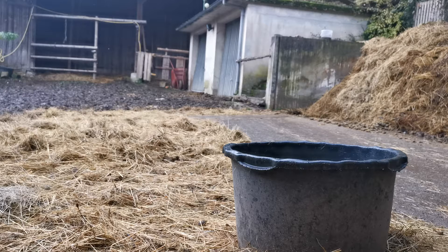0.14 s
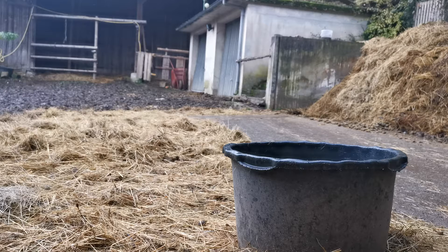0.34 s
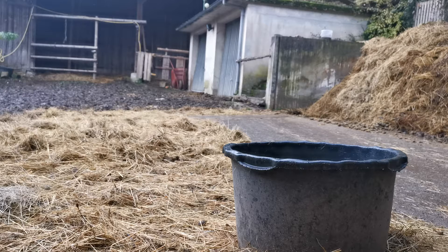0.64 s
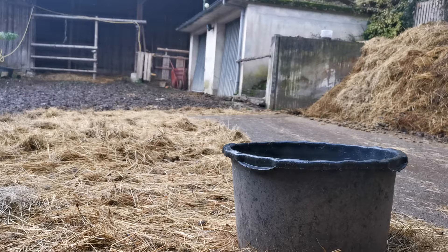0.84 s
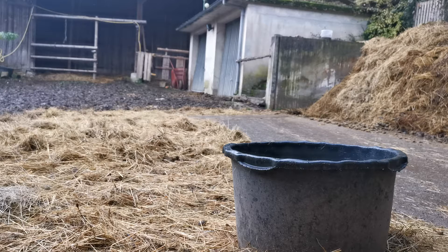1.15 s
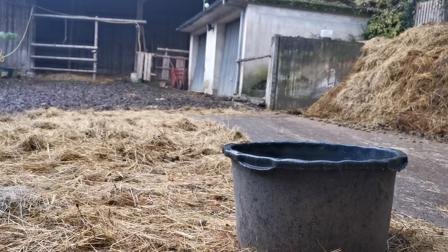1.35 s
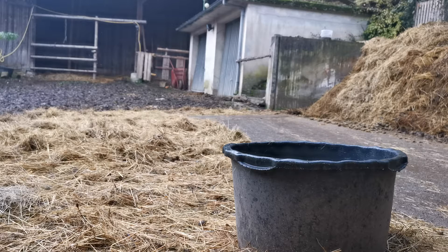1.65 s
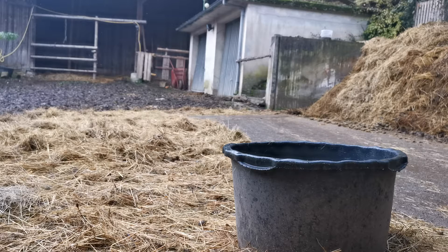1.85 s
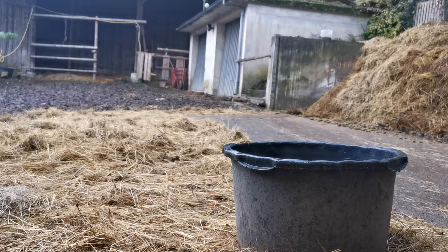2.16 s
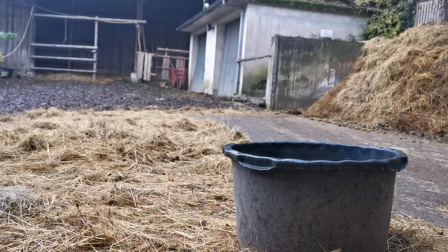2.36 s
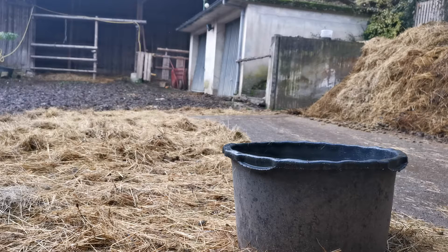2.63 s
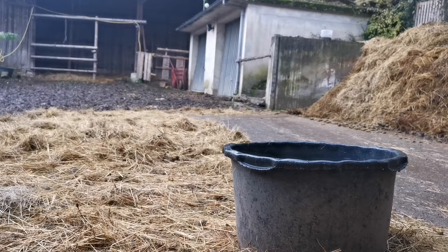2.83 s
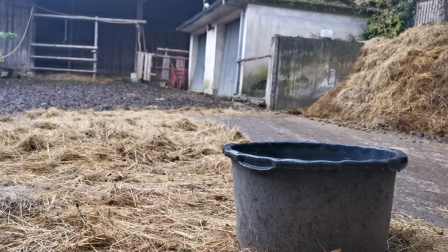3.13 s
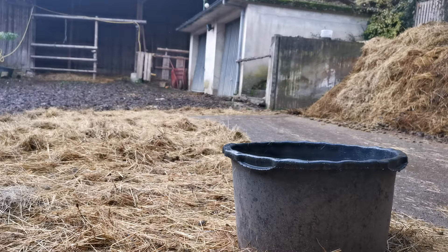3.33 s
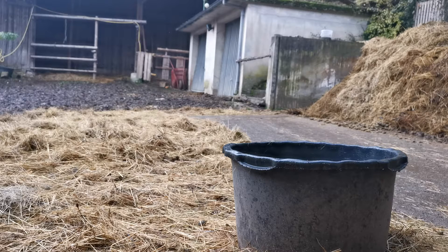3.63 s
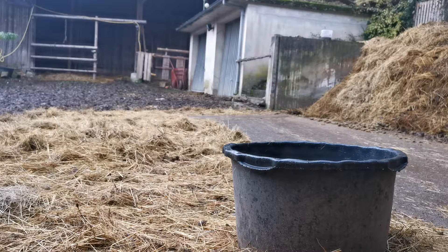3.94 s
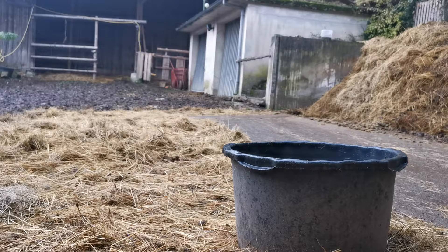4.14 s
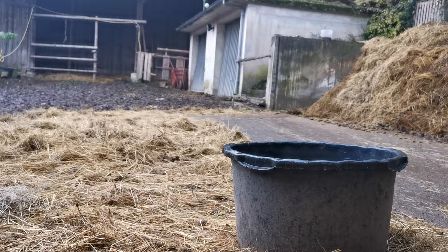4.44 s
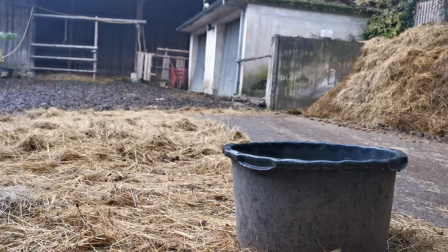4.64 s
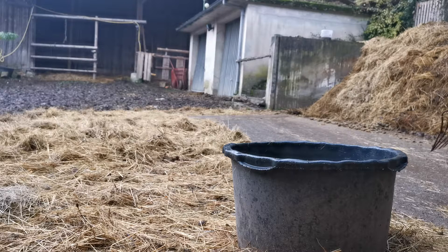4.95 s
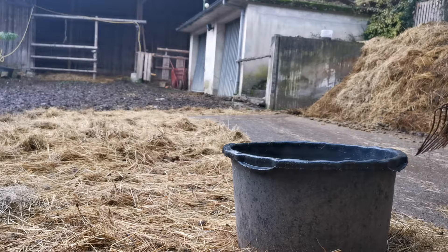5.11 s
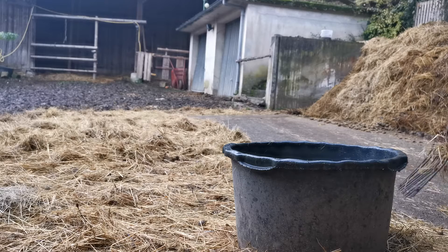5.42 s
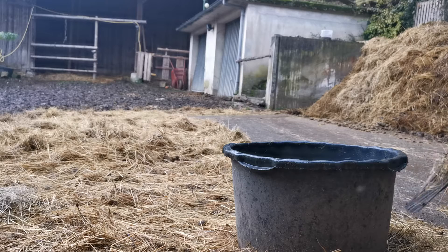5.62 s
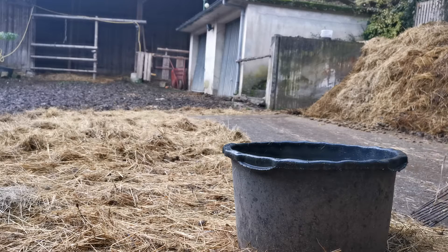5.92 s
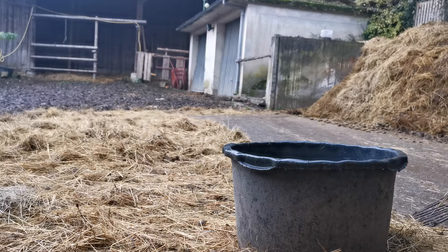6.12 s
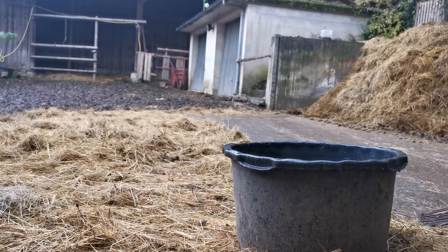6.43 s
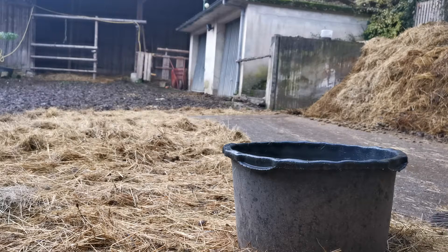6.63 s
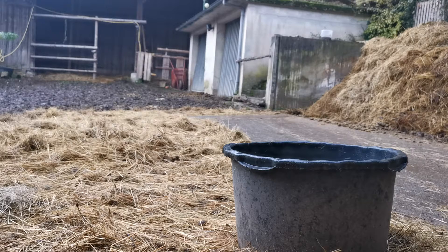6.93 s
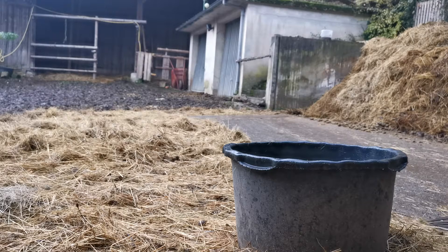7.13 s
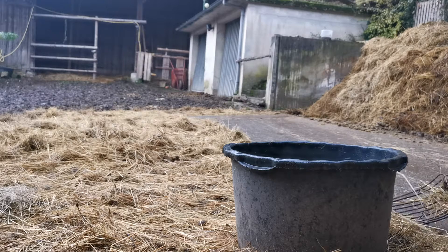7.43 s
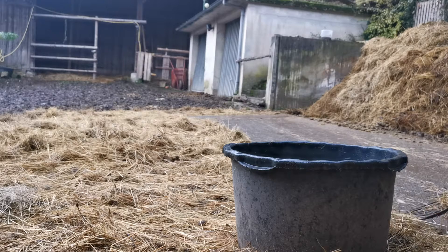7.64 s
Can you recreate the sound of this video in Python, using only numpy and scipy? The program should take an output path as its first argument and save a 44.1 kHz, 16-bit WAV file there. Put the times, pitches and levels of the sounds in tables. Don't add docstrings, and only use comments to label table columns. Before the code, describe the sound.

Close stereo pickup outdoors: small metallic taps lead to two hard, hollow tub blows. Faint grit shuffles, then a rapid run of bright blade scrapes and another burst of booming, clanking knocks. It falls much quieter, with dull treads and dry straw rustle over faint distant air, before steel tines scrape sharply across the ground and finish with crisp ticks.

```python
import sys
import numpy as np
from scipy import signal
from scipy.fft import rfft, irfft, next_fast_len
from scipy.io import wavfile

SR = 44100
rng = np.random.default_rng(int(sys.argv[2]) if len(sys.argv) > 2 else 0)


def linear_from_db(decibels):
    return 10 ** (np.asarray(decibels, float) / 20)


def wav_out(sig):
    wavfile.write(sys.argv[1], SR, np.round(np.clip(np.atleast_2d(sig).T, -1, 1) * 32767).astype(np.int16))


N = 342657
SIZE, HIT_SIZE = next_fast_len(N + 20000, True), 2 ** 13
STEP = 32

# (frequency [Hz], level [dB])
AIR_COLOUR = [(12, -33), (25, 5.5), (55, 2.5), (161, -9.5), (393, -13.5), (534, -10.5), (767, -12),
              (1380, -13.5), (3000, -16.5), (4800, -23), (7310, -21), (9930, -42.5), (15500, -41)]
AIR_DB = -62
# (frequency [Hz], width [Hz], level [dB], end [s])
HINGE = (1830, 150, -65, 0.2)
# (frequency [Hz], width [Hz], level [dB])
HINGE_UPPER = (2200, 220, -6)
# (frequency [Hz], width [Hz], level [dB])
TUB_MODES = [(99, 16, -10.5), (142, 27, 3.5), (247, 16, -4.5), (317, 16.7, -4), (412.2, 7, -5.5),
             (492, 6, -17.5), (554, 15, -24), (710, 30, -7.5)]
# (frequency [Hz], width [Hz], level [dB])
BLADE_MODES = [(1080, 32, -1.5), (1420, 61, -2), (1730, 20, -6.5), (2180, 44, 4), (2550, 25, -13.5),
               (3010, 77, -16.5), (4200, 350, -9.5), (7120, 1000, 5.5)]
# (frequency [Hz], level [dB])
DRAG_COLOUR = [(20, -35), (40, -13.5), (97, 1.5), (270, -1.5), (410, 6.5), (550, 1.5), (1140, -3.5),
               (1640, -2.5), (2600, -3.5), (5500, -16), (7200, -22), (9800, -37.5), (15500, -50)]
DRAG_EDGES_HZ = (20, 250, 900, 3500, 16000)
# (time [s], wall level [dB], boom level [dB], own pitch [Hz], contact [s])
BLOWS = [(0.311, -34.5, -71, 382, 0.027), (0.332, -34, -48.5, 385, 0.091), (0.902, -9.5, -19, 554, 0.016),
         (1.059, -11.5, -18, 416, 0.13), (1.302, -55, -40, 322, 0.046), (2.827, -30.5, -37, 730, 0.044),
         (3.045, -53, -36, 386, 0.026), (3.107, -42, -28.5, 270, 0.044), (3.5565, -21.5, -23, 171, 0.098),
         (3.674, -26, -31.5, 241, 0.036), (3.733, -31.5, -40, 342, 0.087), (3.796, -20.5, -38, 382, 0.1),
         (3.895, -38, -38, 431, 0.036), (3.951, -23.5, -23.5, 270, 0.089), (4.565, -52, -81, 249, 0.2),
         (3.575, -27.5, -40, 304, 0.025)]
# (time [s], clack
# level [dB], crack level [dB], own pitch [Hz], contact [s])
TAPS = [(0.259, -32, -30, 2840, 0.05), (0.313, -30.5, -37.5, 1060, 0.0058),
        (0.418, -42.5, -43.5, 1100, 0.054), (0.461, -18, -39, 2014, 0.032), (0.526, -49, -40, 2830, 0.045),
        (0.544, -36.5, -37, 1740, 0.084), (0.687, -33.5, -71, 2310, 0.088),
        (0.756, -56, -37.5, 3940, 0.015), (0.897, -20, -26.5, 1044, 0.088), (0.94, -37, -23, 910, 0.023),
        (1.015, -44, -33.5, 1040, 0.054), (1.058, -18, -22.5, 1020, 0.056),
        (2.242, -19.5, -15.5, 1990, 0.0064),
    (2.276, -26.5, -53, 2420, 0.023),
    (2.288, -37, -21.5, 2500, 0.042),
    (2.344, -25.5, -47, 2460, 0.053),
    (2.379, -21.5, -21, 2550, 0.041),
    (2.437, -41, -72, 2160, 0.046),
    (2.49, -20, -23.5, 2260, 0.18),
    (2.534, -35.5, -38, 1560, 0.12),
    (2.615, -27, -25, 1730, 0.012),
    (2.696, -37.5, -40.5, 1730, 0.024),
        (2.827, -17, -25, 826, 0.045), (2.9276, -28.5, -37, 2400, 0.031), (2.945, -24, -24, 2870, 0.058),
           (3.011, -70, -35, 4030, 0.042), (3.048, -24.5, -31, 2070, 0.024),
           (3.097, -33.5, -51.5, 1900, 0.041), (3.129, -27.5, -44, 1730, 0.041),
           (3.324, -40, -34, 2500, 0.006), (3.554, -19.5, -26, 764, 0.043),
           (3.7914, -14.5, -71, 1080, 0.095), (3.8046, -14.5, -16, 1213, 0.076),
           (3.8948, -18.5, -28.5, 1090, 0.11), (4.073, -38, -43.5, 1420, 0.03)]
# (start [s], hold [s], wall level [dB], rumble over wall [dB])
SHOVES = [(0.5, 0.0047, -60, -3.5), (0.71, 0.008, -65, 5), (0.78, 0.24, -74, 10), (1.17, 0.075, -64, 17.5),
          (1.63, 0.021, -77.5, 22), (1.72, 0.093, -62, 6.5), (1.85, 0.0025, -48, -6),
          (1.96, 0.026, -70.5, 21), (2.045, 0.042, -52, 1), (2.25, 0.054, -52, 3.5),
          (2.41, 0.054, -61.5, 14.5), (2.51, 0.087, -57.5, 8), (2.68, 0.031, -63.5, -14.5),
          (2.98, 0.0039, -62.5, -3), (3.075, 0.053, -58.5, 1), (3.2, 0.058, -67, 4),
          (3.42, 0.074, -58.5, -2), (3.63, 0.081, -55, 1.5), (3.83, 0.0015, -29.5, -3),
          (3.89, 0.056, -43, -2.5), (4.04, 0.042, -63, 11.5)]
# (start [s], hold [s], grit level [dB], fine grit over grit [dB])
PUSHES = [(0.5, 0.016, -65, -3), (0.71, 0.00085, -65, 7), (0.75, 0.06, -64.5, 7),
          (0.925, 0.004, -44.5, 0.5), (0.99, 0.067, -68, 2), (1.1, 0.0034, -62.5, 3.5),
          (1.27, 0.021, -71.5, 0.5), (1.7, 0.14, -71.5, 1.5), (1.8, 0.049, -64.5, -5),
          (1.96, 0.015, -64, -3.5), (2.03, 0.042, -69.5, 0.5), (2.25, 0.099, -56.5, 0.5),
          (2.41, 0.011, -66, -3), (2.5, 0.15, -65, -1), (2.72, 0.03, -66.5, -16), (2.8, 0.22, -71.5, 5.5),
          (3.065, 0.013, -58.5, -6), (3.13, 0.0065, -56.5, 0.5), (3.35, 0.17, -80.5, 12.5),
          (3.48, 0.0015, -45, -7), (3.59, 0.002, -61, 3.5), (3.66, 0.053, -56, -19.5),
          (3.83, 0.0036, -49.5, -2), (3.92, 0.049, -53.5, -15.5)]
# (start [s], hold [s], grit level [dB], fine grit over grit [dB])
JERKS = [(2.3, 0.0054, -48, -18), (2.405, 0.0052, -49.5, 4), (2.437, 0.0061, -46.5, 4),
         (2.487, 0.0022, -43.5, -9.5), (2.51, 0.016, -43, -7), (2.545, 0.0088, -43.5, 0),
         (2.563, 0.0033, -54.5, 9), (2.59, 0.0034, -47, 2.5), (3.055, 0.022, -45.5, -8.5),
         (3.108, 0.0031, -52, -1), (3.95, 0.011, -54, 0)]
RATTLE_AFTER_S, RATTLE_HOLD_S = 0.038, 0.0036
RATTLE_RUMBLE_DB, RATTLE_WALL_DB = -18, -27.5
DRAG_BED_DB = (-80, -85.5, -77, -83)
BLOW_CLICK_DB, CLICK_PER_DB = 20, 0.44
GRAIN_CONTRAST = (.6, .7, 1.01, 1.2)
# (time [s], level [dB])
SET_DOWN = (1.0595, -15.5)
# (frequency [Hz], level [dB], t60 [s])
HOLLOW = [(137, -12, 0.11), (203, -3.5, 0.14), (322.4, 1.5, 0.07), (382, -4, 0.072), (431, 8, 0.11),
          (513, -1.5, 0.23), (587, -3, 0.13)]
# (time
# [s], ring level [dB], crack level [dB], pitch [Hz], t60 [s])
TICKS_AND_RINGS = [(0.2601, -34, -27, 3100, 0.0085), (0.308, -29, -41, 810, 0.011), (0.3321, -45, -56, 734, 0.057),
                   (0.4616, -31.5, -26.5, 1080, 0.038), (0.5195, -53, -30.5, 2700, 0.0088),
                   (0.557, -41, -41, 4200, 0.0077), (0.611, -49, -58, 1070, 0.032), (0.69, -36.5, -67, 2630, 0.074),
                   (0.695, -30, -63.5, 2840, 0.017), (0.703, -39.5, -66, 1750, 0.086),
                   (0.7297, -41, -66, 1230, 0.014), (0.804, -38, -39, 2020, 0.011), (0.9038, -21.5, -27, 1057, 0.074),
                   (1.609, -50, -56, 3730, 0.018), (1.756, -50, -58, 2060, 0.055), (1.841, -34, -50, 1080, 0.014),
                   (1.848, -37, -51, 1084, 0.06), (1.981, -48, -50, 2460, .02), (2.04, -48.5, -60, 1577, 0.17),
                   (2.06, -49, -60, 2090, 0.091), (2.2038, -42, -55, 2250, 0.016), (2.332, -39, -45, 2500, .008),
                   (2.345, -33, -30.5, 4000, 0.006), (2.434, -41, -34, 4200, 0.0083), (2.446, -34, -34, 2300, 0.0092),
                   (2.457, -30, -42, 2160, 0.012), (2.468, -40, -44, 2400, .008), (2.489, -25, -21, 1580, 0.011),
                   (2.506, -47, -25, 2300, .012), (2.524, -29, -43, 1010, .012), (2.541, -26.5, -24, 4440, 0.014),
                   (2.563, -29, -29, 2240, 0.0083),
                   (2.5863, -35, -40, 2500, 0.011), (2.604, -43, -25, 3500, .006), (2.647, -39, -55, 1060, 0.017),
         (2.735, -46, -48, 2500, .01), (3.109, -35, -46, 1200, 0.018), (3.631, -44, -44, 2230, 0.12),
         (3.653, -30.5, -50, 830, 0.027), (3.667, -42, -41, 2900, 0.01), (3.676, -29, -52, 1020, 0.041),
         (3.706, -26, -52, 705, 0.012), (3.719, -26, -50, 636, 0.015), (3.742, -26, -53, 900, .02),
         (3.745, -44, -56, 2400, 0.047), (3.749, -32, -54, 1134, 0.06), (3.792, -27, -16.5, 3620, 0.038),
         (3.806, -20.5, -44, 2770, 0.033), (3.82, -32, -60, 2140, 0.11), (3.85, -39, -58, 1920, 0.21),
         (3.904, -35, -21.5, 1130, 0.048), (4.045, -45, -56, 1280, 0.034), (7.09, -46, -70, 3290, 0.091),
         (7.1173, -40, -40, 3270, 0.032), (7.392, -38, -60, 5000, .03), (7.396, -32, -60, 660, 0.033),
         (7.462, -26.5, -65, 3934, 0.069), (7.7, -52, -69, 1065, 0.052),
                   (1.165, -40, -84, 48, 0.29), (2.6, -36.5, -90, 75, 0.23), (3.06, -29, -44, 1150, 0.022),
         (2.9, -44, -51, 7500, 0.006), (3.378, -45, -57, 6800, 0.02), (3.4056, -35, -44, 7350, 0.0088),
         (3.41, -39.5, -90, 95, 0.25), (3.5531, -11, -58, 228, 0.052), (3.5539, -9.5, -55, 673, 0.016),
         (3.624, -30, -60, 253, 0.046), (3.691, -26, -75, 210, .031), (3.712, -23, -66, 242, .041),
         (3.8935, -37, -39, 690, 0.012), (4.57, -51, -90, 570, 0.19), (4.581, -49.5, -90, 251.5, 0.26),
         (4.8275, -42, -30, 11000, 0.0046), (5.2945, -57, -60, 8000, .011), (4.7, -45, -63, 150, .081),
         (5.3165, -53, -48, 11500, 0.0071), (7.6, -32.5, -53, 4050, .024), (7.638, -49, -54.5, 6000, 0.014)]
SWELL_PER_S = 0.35
# (start [s], hold [s], level [dB])
DUST = [
    (1.74, 0.1, -61),
    (2.04, 0.048, -63.5),
    (6.169, .04, -74),
]
# (centre [Hz], width [Hz])
DUST_BAND = (6970, 350)
# (frequency [Hz], width [Hz], level [dB])
TINE_MODES = [(624, 62, 4.5), (1230, 170, -1), (2400, 98, 3), (3220, 13, -6), (3650, 46, 1.5),
              (3800, 57, -11.5), (4900, 87, -4), (7110, 400, 0.5)]
# (frequency [Hz], level [dB])
RAKE_COLOUR = [(20, -11), (40, -4), (200, -17.5), (673, -7), (808, -5), (1100, 2.5), (1900, 5), (2400, 4.5),
               (3680, 6), (5700, 4), (7200, 3), (9800, -13), (15500, -27.5)]
RAKE_EDGES_HZ = (20, 300, 1500, 4500, 16000)
# (start [s], hold [s], thump level [dB], stalks over thump [dB])
TREADS = [
    (4.62, 0.016, -61, -41),
    (4.8, 0.092, -69, -15),
    (5.0, 0.037, -87.5, 14.5),
    (5.27, 0.14, -69.5, -13),
    (5.9, 0.0099, -79.5, 6),
    (6.1, 0.055, -76, 0),
    (7.4, 0.0045, -52.5, -5.5),
    (7.45, 0.027, -61.5, 3.5),
    (7.6, 0.015, -66, -22),
]
# (start [s], hold [s], rustle level [dB], fine rustle over rustle [dB])
RUSTLES = [(4.79, 0.069, -71.5, 8), (5.0, 0.17, -73.5, -0.5), (5.33, 0.049, -71.5, 4.5),
           (5.45, 0.065, -70, -9), (5.75, 0.23, -75, 0), (5.9, 0.0032, -72, -2.5), (6.08, 0.032, -72, -2.5),
           (6.38, 0.055, -74, -0.5), (6.62, 0.029, -68.5, -6.5), (7.468, 0.0044, -53, 2.5),
           (7.565, 0.0014, -56.5, 3), (7.63, 0.066, -68, 6)]
# (time [s], clack level [dB], crack level [dB], own pitch [Hz], contact [s])
SNAPS = [(4.7711, -66, -71, 2570, 0.026), (4.788, -49, -54, 3010, 0.034), (4.826, -40.5, -35, 7320, 0.044),
         (5.3145, -64, -38.5, 8440, 0.029), (5.803, -59.5, -48.5, 1270, 0.02),
         (5.871, -39.5, -42.5, 3240, 0.083), (5.911, -44, -51, 3130, 0.04), (6.021, -47, -51, 2110, 0.064),
         (6.069, -43, -44, 1347, 0.079), (6.185, -49, -53.5, 1350, 0.28),
         (6.543, -45.5, -55.5, 2400, 0.027), (6.565, -49, -52, 1580, 0.032), (6.789, -53, -69, 2780, 0.029),
         (7.47, -27, -23.5, 3850, 0.024), (7.553, -38, -63, 2400, 0.087), (7.602, -35, -29.5, 7140, 0.027),
         (7.625, -47.5, -63, 6630, 0.022), (7.66, -47, -52, 3930, 0.033), (7.752, -49, -46, 7200, 0.041)]
# (time [s], level [dB])
RAKE_PULL = [
    (7.0, -76.5),
    (7.09, -72.5),
    (7.124, -52.5),
    (7.19, -51.5),
    (7.22, -47.5),
    (7.27, -46.5),
    (7.31, -42),
    (7.4, -50.5),
    (7.43, -74),
    (7.53, -84),
]
# (start [s], hold [s], tine level [dB], fine rustle over tines [dB])
SNAGS = [(7.11, .003, -52, 6.5), (7.12, 0.018, -66, -0.5), (7.155, 0.0071, -66.5, 16.5),
         (7.202, 0.034, -51.5, 1), (7.242, 0.0056, -60, -10), (7.284, 0.009, -54.5, 5),
         (7.314, 0.0066, -52, 8), (7.329, 0.0018, -65, -5.5), (7.341, .006, -50, 10),
         (7.368, 0.0086, -51.5, 2.5), (7.393, 0.0058, -47, 4), (7.411, 0.0025, -51, -0.5),
         (7.428, .003, -51, 2), (7.445, 0.0017, -55.5, 3)]
RAKE_SHARES_DB = (-30, -1, -8.5, 4.5)
STRAW_BED_DB = (-68, -103.5, -98.5, -96)
# (level [dB], t60 [s], dull above [Hz])
YARD = (-21.5, 0.16, 1280)
# (frequency [Hz], left minus right [dB])
PORT_TILT = [(60, -1), (1000, -2.3), (2700, -7.5), (4500, -2), (5700, 0.54), (6500, -.6), (8500, 6.68),
             (11000, 5.4), (14000, 0.83)]
# (frequency [Hz], likeness [0-1])
NEAR = [(60, 0.97), (1000, 0.99), (2500, 0.98), (4500, 0.57), (6000, 0.16), (9000, 0.15), (13000, 0.01)]
# (frequency [Hz], likeness [0-1])
FAR = [(60, 0.42), (800, 0.73), (2500, 0.71), (4500, 0.091), (6000, 0.035)]
OVERLOAD = .5


def at_hz(points, hz):
    x, y = np.array(points).T
    return np.interp(np.log(hz + 1), np.log(x), y)


def drift(rate):
    r = np.exp(-80 * np.pi * rate / SR)
    white = rng.standard_normal(N // 40 + 2002)
    slow = signal.lfilter([1], [1, -2 * r, r * r], white)[2000:]
    return np.interp(np.arange(N) / 40, np.arange(len(slow)), slow / slow.std())


def peak(hz, centre_hz, width_hz):
    damping = 1j * hz * width_hz
    return damping / (centre_hz ** 2 - hz ** 2 + damping)


def air():
    hz, t = np.fft.rfftfreq(SIZE, 1 / SR), np.arange(N) / SR
    white = rfft(rng.standard_normal(SIZE))
    hiss = irfft(white * linear_from_db(at_hz(AIR_COLOUR, hz)), SIZE)[:N]
    breathing = linear_from_db(AIR_DB + 1.2 * drift(2.5))
    centre, width, db, end_s = HINGE
    upper_hz, upper_width, upper_db = HINGE_UPPER
    rings = peak(hz, centre, width) ** 2 + linear_from_db(upper_db) * peak(hz, upper_hz, upper_width) ** 2
    squeak = irfft(white * rings, SIZE)[:N]
    fade = np.clip((end_s - t) * 9, 0, 1)
    return breathing * hiss / hiss.std() + linear_from_db(db) * squeak / squeak.std() * fade


def layers(colour, edges, size):
    hz, out = np.fft.rfftfreq(size, 1 / SR) + 1, []
    for low, high in zip(edges, edges[1:]):
        slopes = np.sqrt((1 + (low / hz) ** 6) * (1 + (hz / high) ** 6))
        cepstrum = irfft(np.log(linear_from_db(at_hz(colour, hz)) / slopes), size)
        cepstrum[1:size // 2] *= 2
        cepstrum[size // 2 + 1:] = 0
        out.append(np.exp(rfft(cepstrum)))
    return hz, out


def ticks():
    hz, registers = layers(DRAG_COLOUR, DRAG_EDGES_HZ, size=HIT_SIZE)
    crack = irfft(registers[-1])
    crack = crack / abs(crack).max()
    t, out = np.arange(HIT_SIZE) / SR, np.zeros(N + HIT_SIZE)
    for s, ring_db, crack_db, pitch_hz, t60 in TICKS_AND_RINGS:
        rise = np.minimum(t / (0.0005 + SWELL_PER_S * t60 * t60), 1)
        decay = linear_from_db(ring_db - 60 * t / max(t60, .003))
        ring = -np.sin(2 * np.pi * pitch_hz * t) * decay * rise
        out[round(s * SR):][:HIT_SIZE] += ring + linear_from_db(crack_db) * crack
    return out[:N]


def grains(per_s, spread_db, clump_db):
    born = rng.random(N) < per_s / SR
    size_db = spread_db * np.minimum(rng.exponential(1, N), 4) + clump_db * drift(52)
    x = born * linear_from_db(size_db) * rng.choice([-1, 1], N)
    return x / x.std()


def scrape(pressures, colour, modes, edges, grit, wander_db, wander_hz):
    hz, registers = layers(colour, edges, size=SIZE)
    t, spectrum = np.arange(N) / STEP, 0
    for register, level, contrast, sign in zip(registers, pressures, GRAIN_CONTRAST, (1, -1, 1, -1)):
        sized = sign * np.sign(grit) * abs(grit) ** contrast
        pressed = sized / sized.std() * np.interp(t, np.arange(len(level)), level)
        spectrum = spectrum + rfft(pressed, SIZE) * register / np.sqrt(np.mean(abs(register) ** 2))
    out = broad = irfft(spectrum, SIZE)[:N]
    for centre, width, db in modes:
        r = np.exp(-np.pi * width / SR)
        poles = [1, -2 * r * np.cos(2 * np.pi * centre / SR), r * r]
        zeros = [(1 - r * r) / 2, 0, (r * r - 1) / 2]
        out = out + signal.lfilter(zeros, poles, broad * linear_from_db(db + wander_db * drift(wander_hz)))
    return out


def strikes(rows, colour, modes, edges, ring_db, trim_db):
    hz, registers = layers(colour, edges, size=HIT_SIZE * 2)
    t, out = np.arange(HIT_SIZE) / SR, np.zeros(N + HIT_SIZE * 2)
    shapes = np.array([linear_from_db(db) * peak(hz, centre, width) for centre, width, db in modes])
    luck_db = rng.normal(0, 4.5, (len(rows), len(modes)))
    noise = rng.standard_normal((len(rows), HIT_SIZE))
    for (s, *levels, pitch, contact_s, click_db), gains_db, chatter in zip(rows, luck_db, noise):
        force = chatter * linear_from_db(-60 * t / max(contact_s, .003)) * np.minimum(t / 0.0025, 1)
        force[0] = -linear_from_db(click_db)
        ringing = 1 + linear_from_db(gains_db) @ shapes + linear_from_db(ring_db) * peak(hz, pitch, pitch / 18)
        body = rfft(force, HIT_SIZE * 2) * ringing
        at = round(s * SR)
        for register, level in zip(registers, levels):
            if level is not None:
                sound = irfft(body * register)
                out[at:at + len(sound)] += linear_from_db(level + trim_db) * sound / abs(sound).max()
    return out[:N]


def strokes(rows, press_db_per_s, lift_db_per_s):
    s, held, db, over_db = np.transpose(rows)[:, :, None]
    t = np.arange(0, N, STEP) / SR
    pressing = press_db_per_s * np.maximum(s - t, 0)
    lifting = lift_db_per_s * np.maximum(t - s - held, 0)
    shape_db = db - pressing - lifting
    return linear_from_db(shape_db).sum(0), linear_from_db(shape_db + over_db).sum(0)


def drag_pressure():
    rattles = []
    for s, wall, boom, *_ in BLOWS:
        rumble_over_wall = boom - wall + RATTLE_RUMBLE_DB - RATTLE_WALL_DB
        rattles.append((s + RATTLE_AFTER_S, RATTLE_HOLD_S, wall + RATTLE_WALL_DB, rumble_over_wall))
    wall, rumble = strokes(SHOVES + rattles, press_db_per_s=302, lift_db_per_s=270)
    pushes = strokes(PUSHES, press_db_per_s=345, lift_db_per_s=310)
    jerks = strokes(JERKS, press_db_per_s=2500, lift_db_per_s=910)
    t = np.arange(0, N, STEP) / SR
    moving = (t > BLOWS[0][0]) & (t < SHOVES[-1][0])
    return np.array([rumble, wall, *np.add(pushes, jerks)]) + np.outer(linear_from_db(DRAG_BED_DB), moving)


def set_down():
    s, level_db = SET_DOWN
    t = np.maximum(np.arange(N) / SR - s, 0)
    rings = sum(linear_from_db(db - 60 * t / t60) * np.sin(2 * np.pi * hz * t) for hz, db, t60 in HOLLOW)
    return linear_from_db(level_db) * rings * np.minimum(t / 0.0032, 1)


def dragging():
    blows = [(s, boom, wall, None, None, *rest, BLOW_CLICK_DB + CLICK_PER_DB * wall)
             for s, wall, boom, *rest in BLOWS]
    taps = [(s, None, None, *rest, 3) for s, *rest in TAPS]
    grit = grains(2500, spread_db=2.0, clump_db=1.43)
    scraped = scrape(drag_pressure(), DRAG_COLOUR, TUB_MODES + BLADE_MODES, DRAG_EDGES_HZ, grit,
                     wander_db=4.0, wander_hz=15.0)
    struck_tub = strikes(blows, DRAG_COLOUR, TUB_MODES, DRAG_EDGES_HZ, ring_db=5.0, trim_db=1.5)
    struck_blade = strikes(taps, DRAG_COLOUR, BLADE_MODES, DRAG_EDGES_HZ, ring_db=14.0, trim_db=-2.0)
    return scraped + struck_tub + struck_blade + set_down()


def dust():
    centre, width = DUST_BAND
    band = signal.butter(2, [centre - width / 2, centre + width / 2], "band", fs=SR, output="sos")
    hiss = signal.sosfilt(band, rng.standard_normal((2, N)))
    level = strokes([(*row, 0) for row in DUST], press_db_per_s=345, lift_db_per_s=310)[0]
    return hiss / hiss.std() * np.interp(np.arange(N) / STEP, np.arange(len(level)), level)


def rake_pressure():
    t = np.arange(0, N, STEP) / SR
    pull = linear_from_db(np.interp(t, *np.transpose(RAKE_PULL), -120, -120))
    treads = strokes(TREADS, press_db_per_s=170, lift_db_per_s=150)
    rustles = strokes(RUSTLES, press_db_per_s=360, lift_db_per_s=372)
    snags = strokes(SNAGS, press_db_per_s=2500, lift_db_per_s=910)
    bed = np.outer(linear_from_db(STRAW_BED_DB), t > TREADS[0][0])
    return np.array([*treads, *np.add(rustles, snags)]) + np.outer(linear_from_db(RAKE_SHARES_DB), pull) + bed


def raking():
    snaps = [(s, None, None, *rest, 6) for s, *rest in SNAPS]
    grit = grains(3500, spread_db=0.5, clump_db=1.55)
    scraped = scrape(rake_pressure(), RAKE_COLOUR, TINE_MODES, RAKE_EDGES_HZ, grit,
                     wander_db=7.0, wander_hz=21.74)
    return scraped + strikes(snaps, RAKE_COLOUR, TINE_MODES, RAKE_EDGES_HZ, ring_db=21.0, trim_db=1.5)


def yard(x):
    db, t60, cut_hz = YARD
    t = np.arange(SR // 3) / SR
    tail = rng.standard_normal(len(t)) * linear_from_db(-60 * t / t60) * (t > .006)
    tail = signal.sosfilt(signal.butter(1, cut_hz, fs=SR, output="sos"), tail)
    return x + linear_from_db(db) * signal.fftconvolve(x, tail / np.sqrt(np.sum(tail ** 2)))[:N]


def ports(x, likeness, smear_s):
    hz, t = np.fft.rfftfreq(SIZE, 1 / SR), np.arange(SR // 4) / SR
    scatter = rfft(rng.standard_normal(len(t)) * linear_from_db(-60 * t / smear_s), SIZE)
    scatter /= np.sqrt(np.mean(abs(scatter) ** 2))
    alike = np.clip(at_hz(likeness, hz), 0, 1)
    sides = np.array([[1], [-1]])
    both = np.sqrt(1 + alike) + sides * np.sqrt(1 - alike) * scatter
    both = both * linear_from_db(sides * at_hz(PORT_TILT, hz) / 2)
    return irfft(rfft(x, SIZE) * both / np.sqrt(2), SIZE)[:, :N]


def scene():
    close = yard(dragging() + raking() + ticks())
    return ports(close, NEAR, smear_s=0.077) + ports(air(), FAR, smear_s=0.42) + dust()


def top_cut(x):
    return signal.sosfilt(signal.butter(12, 15100, fs=SR, output="sos"), x)


def record(dry):
    mix = OVERLOAD * np.tanh(dry / OVERLOAD)
    return top_cut(mix)


dry = scene()
out = record(dry)
wav_out(out)
```